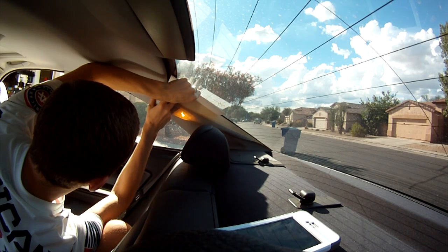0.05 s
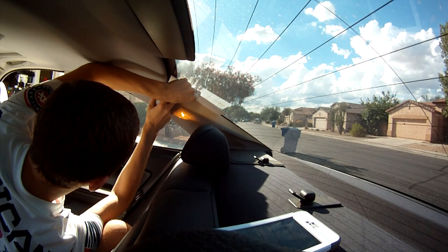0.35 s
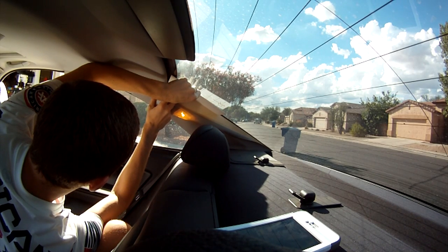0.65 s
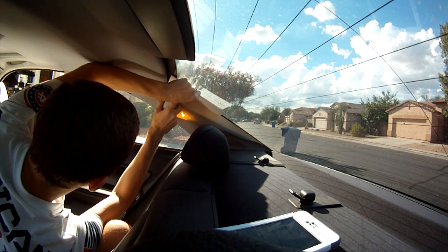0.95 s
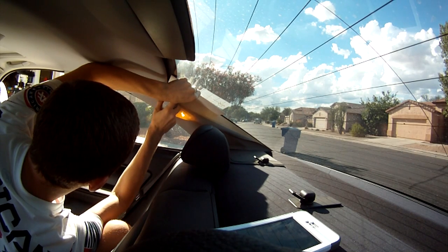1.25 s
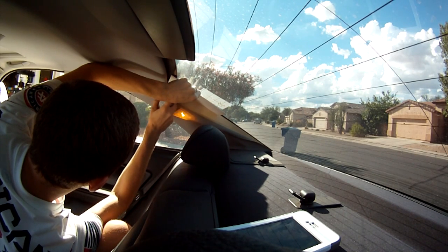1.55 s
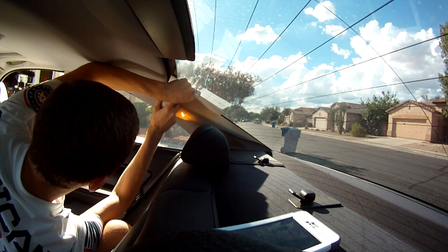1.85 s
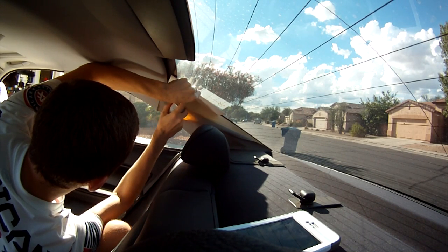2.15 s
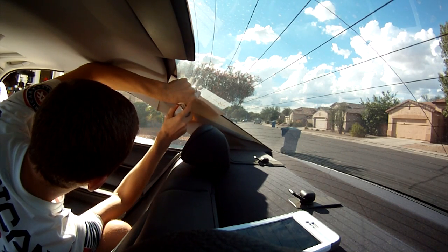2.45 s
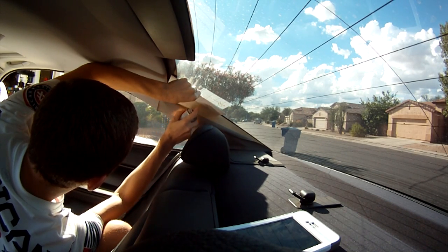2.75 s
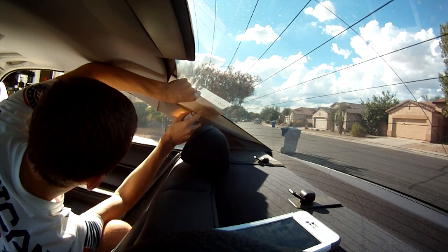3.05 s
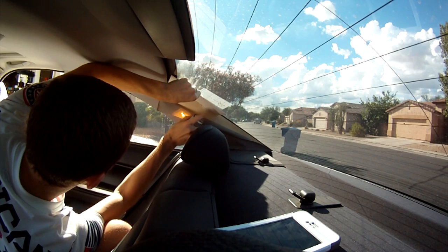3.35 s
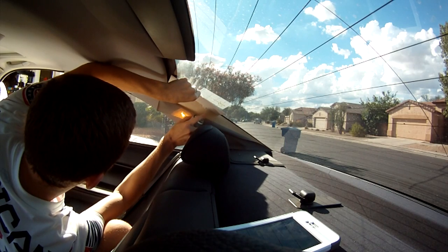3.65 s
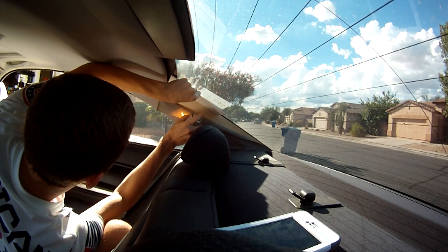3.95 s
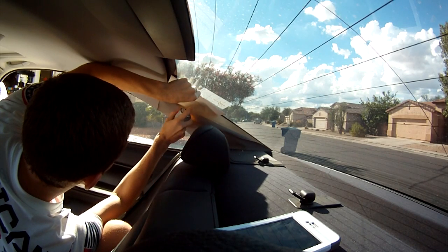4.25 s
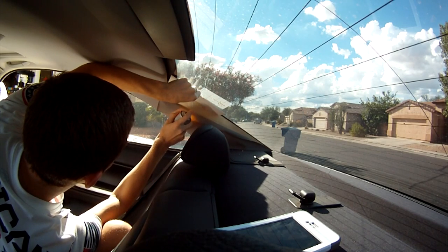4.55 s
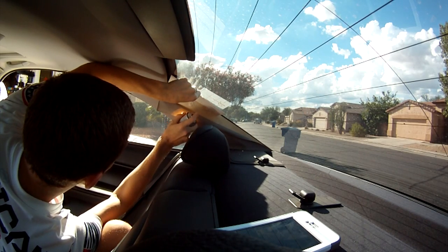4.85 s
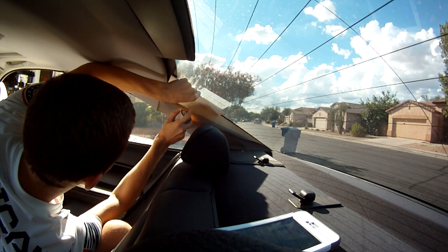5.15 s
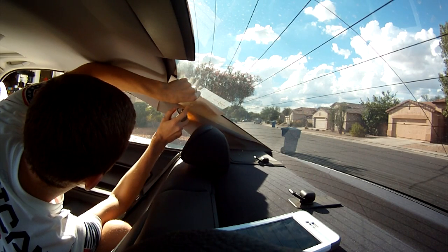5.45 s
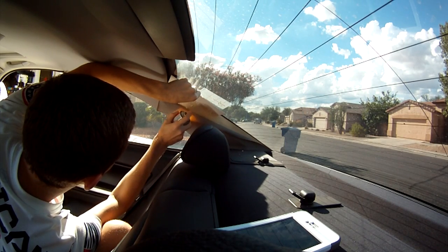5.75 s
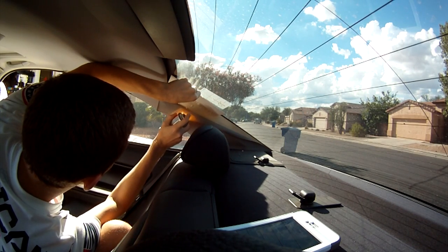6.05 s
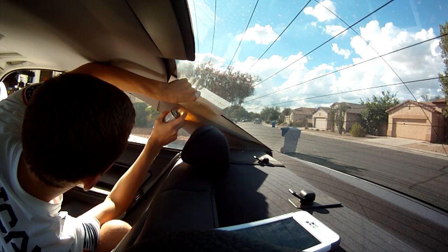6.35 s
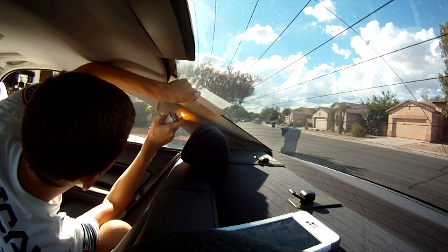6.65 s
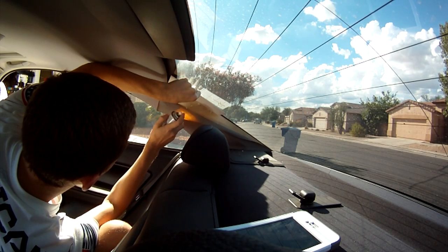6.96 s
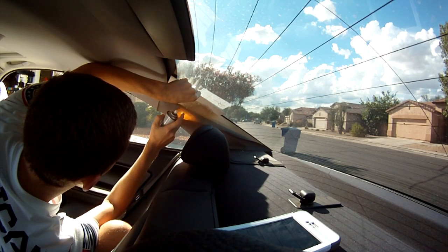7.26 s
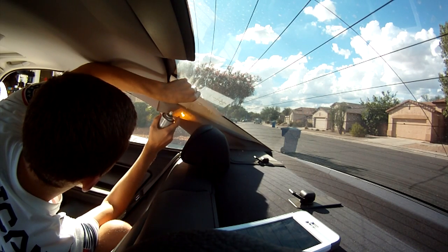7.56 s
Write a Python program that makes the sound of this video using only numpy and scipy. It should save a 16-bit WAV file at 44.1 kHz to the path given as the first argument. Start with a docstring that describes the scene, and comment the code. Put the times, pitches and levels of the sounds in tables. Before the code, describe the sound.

A low street rumble and a faint hiss run throughout inside a parked car. At about 0.9 seconds a can of spray adhesive gives a short, bright hiss, an arm's length from the microphone, then its nozzle dribbles and spits. Two slightly longer sprays follow at 2.0 and 2.5 seconds. Around 3 seconds the nozzle sputters with tiny wet squeaks, and the trim takes a dull knock just before a weaker spray at 3.2. Short bursts come at 3.4, 4.1, 4.6, 5.2 and 5.7 seconds, growing louder, the last two very brief. A hand taps lightly on the can near 3.9 and 6.6 seconds. The cabin adds tight reflections, and the rumble swells softly around 5.4 and 6.5 seconds. After the last burst, wet glue fizzes very faintly under the rumble until the end, near 7.6 seconds.

```python
"""A low street rumble and a faint hiss fill a parked car; then a can of spray adhesive hisses at the
door pillar, an arm's length from a small camera. Each full press gives a turbulent jet; between the
early ones the half-open valve dribbles, spits glue and squeaks. Wet glue fizzes, the trim takes a dull
knock and a hand shifts on the can. The cabin adds short reflections and booms in its low air modes;
the microphone rings near 5.7 kHz."""
import sys
import numpy as np
from scipy import signal
from scipy.fft import rfft, irfft
from scipy.io import wavfile
from scipy.ndimage import uniform_filter1d

SR = 44100
rng = np.random.default_rng(int(sys.argv[2]) if len(sys.argv) > 2 else 0)


def transcribe(signal):
    """Save signal, clipped to [-1, 1], as a 16-bit WAV file at the path in sys.argv[1]."""
    frames = np.atleast_2d(signal).T
    limited = np.clip(frames, -1, 1)
    pcm = np.round(limited * 32767).astype(np.int16)
    wavfile.write(sys.argv[1], SR, pcm)


N = 335292
T = np.arange(N) / SR


def undb(db):
    """Decibels to amplitude ratio."""
    return 10 ** (np.asarray(db) / 20)


def unit(x):
    """Normalisation to rms 1."""
    return x / np.sqrt(np.mean(x ** 2) + 1e-18)


def curve(rows):
    """Linear interpolation of (time_s, value) rows."""
    return np.interp(T, *np.transpose(rows))


def walk(per_s, size=N):
    """Random modulation: Gaussian values joined by straight lines, with a spread near 1."""
    steps = np.arange(size) / SR * per_s
    return 1.2 * np.interp(steps, np.arange(4096), rng.standard_normal(4096))


def add(out, start_s, x):
    """Superposition of x on out from a given time."""
    i = int(start_s * SR)
    out[i:i + len(x)] += x[:N - i]


def colour(x, points, size=4096):
    """Minimum-phase filtering by (frequency_hz, gain_db) points: causal, so attacks stay sharp."""
    hz, db = np.transpose(sorted(map(tuple, points)))
    bin_hz = np.arange(size // 2 + 1) * SR / size
    log_gain = np.log(undb(np.interp(np.log(bin_hz + 1), np.log(hz), db)))
    cepstrum = irfft(log_gain)
    cepstrum[1:size // 2] *= 2
    cepstrum[size // 2 + 1:] = 0
    response = irfft(np.exp(rfft(cepstrum)))
    return signal.oaconvolve(x, response)[:len(x)]


def noise(spectrum):
    """Spectral shaping of white noise, at rms 1."""
    return unit(colour(rng.standard_normal(N), spectrum))


def bursts(events, spectrum, attack_s, gain_db, pop=0, pop_s=0.0019):
    """Noise transients with exponential decay and an optional pop; overlapping ones add in power."""
    power, t = np.zeros(N), T[:SR // 5]
    for start, db, t60 in events:
        onset = 1 - np.exp(-t / attack_s)
        decay = undb(-60 * t / t60) + pop * np.exp(-t / pop_s)
        add(power, start, (onset * decay * undb(db + gain_db)) ** 2)
    return noise(spectrum) * np.sqrt(power)


# Spectrum of the street rumble: frequency_hz, gain_db
RUMBLE_SPECTRUM = [(15, -71), (25, -53), (37, -19), (75, -25), (102, -8.5), (144, -6.5), (178, -1),
                   (252, -10.5), (310, -5), (383, -15.5), (509, -9.5), (657, -31), (741, -12.5), (860, -39),
                   (900, -13.5), (1170, -42), (1980, -120)]
# Swells that drive the boom: time_s, level_db
RUMBLE_SWELLS = [(0, -66.5), (0.7, -65), (1.1, -66), (1.6, -63), (1.9, -65), (3.0, -66), (3.2, -64.5),
                 (4.1, -60), (4.45, -66), (5.0, -62), (5.4, -55.5), (5.9, -61), (6.45, -56), (7.05, -66.5),
                 (7.6, -64)]
# Low air modes of the cabin: frequency_hz, width_hz, relative_db
AIR_MODES = [(126.5, 30, -6.5), (181.7, 20.3, 2), (315, 33, 0.5)]

def rumble(steady_db=-66, boom_gain_db=-1):
    """Cavity resonance: power in excess of the steady street rumble booms in the cabin's air modes."""
    street = noise(RUMBLE_SPECTRUM) * undb(steady_db)
    excess_power = np.maximum(undb(curve(RUMBLE_SWELLS)) ** 2 - undb(steady_db) ** 2, 0)
    boom = np.zeros(N)
    for hz, width, db in AIR_MODES:
        b, a = signal.iirpeak(hz, hz / (2 * width), fs=SR)
        band = signal.lfilter(b, a, rng.standard_normal(N))
        boom += unit(signal.lfilter(b, a, band)) * undb(db)
    return street + unit(boom) * np.sqrt(excess_power) * undb(boom_gain_db)


# Spectrum of the background hiss: frequency_hz, gain_db
HISS_SPECTRUM = [(350, -32), (600, -3.5), (777, -6), (1110, -11), (1410, -9.5), (1620, -9), (1810, -8.5),
                 (2130, -13), (3710, -12.5), (5980, -8), (8990, -20), (9760, -19.5), (15500, -33.5)]
# Its slow drift: time_s, relative_db
HISS_DRIFT = [(0.8, -66.5), (3.7, -64.5), (6.2, -65), (7.6, -66)]

def hiss(gain_db=-1):
    """Ambient noise floor: faint, broadband and nearly stationary."""
    return noise(HISS_SPECTRUM) * undb(curve(HISS_DRIFT) + gain_db)


# Spectrum of the open jet: frequency_hz, gain_db
JET_SPECTRUM = [(40, -43), (200, -29), (420, -22.5), (630, -24.5), (980, -14.3), (1200, -14.5), (1900, -17),
                (2500, -20.5), (3400, -14.5), (4400, -9), (5200, 1.95), (6100, -1.35), (7000, -6),
                (9200, -15.5), (15000, -19.5)]
# Presses of the valve: open_s, close_s, level_db, rise_s, fall_s, trim_echo_ms, trim_echo_ratio,
# breadth_db, body_hz, body_db, edge_db. The last four set how broad each hiss is, the pitch and
# strength of its body, and its sharp edge.
VALVE_PRESSES = [(0.877, 1.079, -30, 0.021, 0.023, 0.79, -0.1, 3, 2230, 4, -4.5),
                 (1.993, 2.348, -27.5, 0.066, 0.027, 0.89, -0.13, 2, 1170, -0.3, -0.5),
                 (2.465, 2.784, -26.5, 0.012, 0.017, 0.408, -0.27, 0.8, 1300, 0, -2.5),
                 (3.174, 3.31, -34, 0.014, 0.27, 0.635, 0.22, 5.5, 1700, -5, -2.5),
                 (3.416, 3.591, -26.5, 0.05, 0.014, 0.85, 0.17, 1.8, 1110, 1, -1),
                 (4.092, 4.271, -23.5, 0.014, 0.012, 0.635, -0.24, 0.8, 1090, -4, 4),
                 (4.573, 4.738, -23.5, 0.033, 0.011, 0.385, -0.19, -5.5, 1740, 6.5, 1.2),
                 (5.206, 5.315, -23, 0.014, 0.011, 0.794, 0.1, -0.5, 1310, -3, 3),
                 (5.717, 5.821, -21.5, 0.0085, 0.011, 0.363, 0.032, -0.5, 870, -0.5, 8)]

def jet(flutter_db=-0.8, surge_db=0.51, initial_opening=0.18, seal_s=0.19):
    """Turbulent jet noise: it builds as the valve cracks open and dies as the stem springs back."""
    out, t = np.zeros(N), T[:SR]
    for start, stop, db, rise, fall, echo_ms, echo_ratio, *aim in VALVE_PRESSES:
        gas = rng.standard_normal(len(t))
        gas = gas + echo_ratio * np.roll(gas, round(echo_ms * SR / 1000))  # comb interference
        gas = resonate(colour(gas, JET_SPECTRUM))
        gas = colour(gas, jet_colour(db, *aim))
        # hand, pillar and windscreen scatter the short waves, differently at each position of the can
        gas = reflections(gas, wet_db=-5, t60_s=0.025, above_hz=2340)
        # glue and propellant leave the nozzle unevenly
        uneven_db = flutter_db * walk(211.4, len(t)) + surge_db * walk(32.3, len(t))
        opening = 1 - (1 - initial_opening) * np.exp(-(t / rise) ** 2)
        released_s = np.maximum(t - (stop - start), 0)
        # the seal shuts however slowly the finger lifts
        closing = np.exp(-released_s / fall - (released_s / seal_s) ** 4)
        add(out, start, unit(gas) * opening * closing * undb(db + uneven_db))
    return reflections(out, wet_db=-12, t60_s=0.042)


# Resonances of the cabin corner and camera housing: frequency_hz, width_hz, lift_db
NARROW_RESONANCES = [(940, 36, 6.5), (1380, 80, 0.5), (1924, 24, 4), (2360, 200, 3.5), (2830, 50, 5),
                     (3360, 32, 1.5), (4200, 20, 5.5), (4760, 85, 1.5), (5260, 140, 2.5), (5690, 120, 3),
                     (6197, 100, 6.5), (7630, 120, 3), (8140, 78, 0.5), (8740, 81, 5.5), (10610, 660, 4.5),
                     (13500, 500, 2.5)]

def resonate(x):
    """Resonance lifts a narrow band around each natural frequency."""
    for hz, width, db in NARROW_RESONANCES:
        band = signal.lfilter(*signal.iirpeak(hz, hz / width, fs=SR), x)
        x = x + (undb(db) - 1) * band
    return x


def jet_colour(level_db, breadth_db, body_hz, body_db, edge_db, mic_hz=5700, edge_hz=3230, usual_db=-28):
    """Directivity and spectral tilt: aim weights three bands; a harder press trades bass for treble."""
    hz = np.geomspace(100, 16000, 60)

    def bump(centre_hz, octaves):
        return np.exp(-(np.log2(hz / centre_hz) / octaves) ** 2)

    flanks_db = breadth_db * (1 - bump(mic_hz, 0.22))  # either side of the microphone's ring
    aim_db = flanks_db + body_db * bump(body_hz, 0.62) + edge_db * bump(edge_hz, 0.38)
    bass = 1 / (1 + (hz / 746) ** 4)
    treble = 1 / (1 + (10000 / hz) ** 6)
    tilt_db = (level_db - usual_db) * (0.91 * treble - 0.44 * bass)
    return zip(hz, aim_db + tilt_db)


def reflections(x, wet_db, t60_s, above_hz=None):
    """Early reflections off nearby glass and trim die quickly; small surfaces return only the treble."""
    t = T[:6000]
    tail = rng.standard_normal(len(t)) * (t > 0.0015) * undb(-60 * t / t60_s)
    if above_hz:
        tail = signal.lfilter(*signal.butter(1, above_hz, "high", fs=SR), tail)
    response = tail * undb(wet_db) / np.linalg.norm(tail)
    response[0] = 1  # direct sound
    return signal.oaconvolve(x, response / np.linalg.norm(response))[:len(x)]


# Spectrum of fizzing and bursting glue: frequency_hz, gain_db
GLUE_SPECTRUM = [(300, -52), (950, -21), (2200, -24.5), (3500, -19.5), (4600, -14.5), (5700, 1.5),
                 (6800, -7), (8500, -19.5), (10000, -25.5), (15000, -34)]

def fizz(level_db=-68, fade_db_per_s=1.5):
    """Effervescence: propellant boils out of wet glue from the first press on, fading after the last."""
    first_press, last_release = VALVE_PRESSES[0][0], VALVE_PRESSES[-1][1]
    db = level_db - fade_db_per_s * np.maximum(T - last_release, 0)
    return noise(GLUE_SPECTRUM) * (T > first_press) * undb(db)


# Big clots bursting from the nozzle: start_s, relative_db
BIG_CLOTS = [(0.878, -22), (1.167, -28.5), (1.199, -24), (1.251, -28.5), (1.258, -22), (1.285, -28),
             (1.296, -22.5), (1.335, -31), (1.347, -26), (1.431, -24.5), (1.46, -24.5), (1.544, -24.5),
             (1.929, -31), (2.426, -22), (2.469, -16.5), (2.851, -24), (2.957, -21), (3.04, -26),
             (3.131, -22), (3.179, -28), (5.891, -24)]

def spits(small_per_s=16, small_offset_db=7, scatter_db=2, t60_s=0.04):
    """Film rupture: each clot pops, then puffs. Small ones come at random, scaled by the dribble's flow."""
    clots = list(BIG_CLOTS)
    for stretch in DRIBBLE_FLOW:
        times, flow_db = np.transpose(stretch)
        jitter, strength = rng.random((60, 2)).T
        starts = times[0] + (np.arange(len(jitter)) + jitter) / small_per_s
        levels = np.interp(starts, times, flow_db) + small_offset_db + scatter_db * (2 * strength - 1)
        clots += [(start, db) for start, db in zip(starts, levels) if start < times[-1]]
    events = [(start, db, t60_s) for start, db in clots]
    return bursts(events, GLUE_SPECTRUM, attack_s=0.0006, gain_db=-11, pop=0.65)


# Flow through the half-open valve, one list per stretch: time_s, relative_db
DRIBBLE_FLOW = [
    [(1.11, -42.5), (1.18, -48.5), (1.32, -49.5), (1.35, -44.5), (1.42, -44), (1.48, -38), (1.6, -41.5),
     (1.81, -40.5), (1.85, -44.5), (2.02, -37.5)],
    [(2.38, -42.5), (2.46, -34.5)],
    [(2.82, -66), (2.89, -53), (2.95, -43.5), (3.07, -41), (3.11, -46), (3.17, -46.5)],
]
# Spectrum of that flow: frequency_hz, gain_db
DRIBBLE_SPECTRUM = [(240, -47), (400, -27.5), (796, -25.5), (942, -13), (1080, -18.5), (1380, -16),
                    (2360, -17), (2880, -16.5), (3110, -20.5), (5650, 2), (8670, -13), (9500, -19.5),
                    (14400, -24), (15500, -34)]

def dribble(bubble_db=3, sputter_db=1.5, treble_hz=8500, treble_db=5, gain_db=-1):
    """Two-phase flow: bubbles and clots modulate the half-open valve's hiss; more flow is brighter."""
    flow = np.zeros(N)
    for stretch in DRIBBLE_FLOW:
        is_open = (T > stretch[0][0] - 0.01) & (T < stretch[-1][0] + 0.01)
        gate = np.abs(uniform_filter1d(is_open.astype(float), size=400))
        flow += undb(curve(stretch)) * gate
    froth = rng.standard_normal(N) * undb(bubble_db * walk(per_s=500) + sputter_db * walk(per_s=90))
    froth = unit(colour(froth, DRIBBLE_SPECTRUM))
    body = signal.sosfiltfilt(signal.butter(2, treble_hz, fs=SR, output="sos"), froth)
    treble = (froth - body) * undb(treble_db) * flow / flow.max()
    return (body + treble) * flow * undb(gain_db)


def choke(gather_s=0.018, depth_db=-5.5):
    """Constriction: the dribble's gain sinks as a big clot gathers and recovers when it bursts."""
    db = np.zeros(N)
    for start, _ in BIG_CLOTS:
        db += depth_db * (T < start) * np.exp(-((T - start) / gather_s) ** 2)
    return undb(db)


# Wet squeaks in the nozzle: start_s, from_hz, to_hz, length_s, peak_db
NOZZLE_SQUEAKS = [(2.963, 1376, 1150, 0.029, -55), (3.007, 1660, 1410, 0.04, -54),
                  (3.033, 2950, 2770, 0.02, -52), (3.033, 1450, 1240, 0.033, -49.5),
                  (3.119, 1260, 1490, 0.019, -55)]

def squeaks(pitch_jitter=0.051):
    """Flow-induced oscillation: gas whistles through a film of glue at an unsteady, gliding pitch."""
    out = np.zeros(N)
    for start, from_hz, to_hz, length, db in NOZZLE_SQUEAKS:
        n = int(length * SR)
        hz = np.linspace(from_hz, to_hz, n) * (1 + pitch_jitter * walk(550, n))
        phase = 2 * np.pi * np.cumsum(hz) / SR
        add(out, start, np.sin(phase) * np.hanning(n) * undb(db))
    return out


# A dull knock on the trim: start_s, pitch_hz, level_db, rise_s, t60_s
TRIM_KNOCK = (3.142, 285, -41, .004, .065)

def knock():
    """Damped free vibration: one soft blow rings a low panel mode."""
    start, hz, db, rise, t60 = TRIM_KNOCK
    t = np.maximum(T - start, 0)
    onset = 1 - np.exp(-(t / rise) ** 2)
    return np.sin(2 * np.pi * hz * t) * onset * undb(db - 60 * t / t60)


# Light contacts of the hand: start_s, relative_db, t60_s
HAND_TAPS = [(3.8729, -40.5, 0.037), (3.8874, -51.5, 0.11), (4.008, -47.5, 0.032), (6.6378, -49, 0.11)]
# Their spectrum: frequency_hz, gain_db
TAP_SPECTRUM = [(800, -24), (1400, -11), (2300, -5), (3800, 1), (5600, 10), (7500, -3), (15000, -28)]

def taps():
    """Contact noise: the hand shifting on the can and trim makes brief broadband transients."""
    return bursts(HAND_TAPS, TAP_SPECTRUM, attack_s=0.00078, gain_db=-1)


def scene():
    """Superposition of all sources in the cabin, the same in both channels."""
    small_sounds = taps() + dribble() * choke() + spits() + squeaks()
    small_sounds = reflections(small_sounds, wet_db=-5, t60_s=0.059)
    mono = jet() + small_sounds + knock() + rumble() + hiss() + fizz()
    return np.array([mono, mono])


def record(dry, cutoff_hz=15450):
    """Band limiting: the camera's steep low-pass filter removes the highest treble."""
    return signal.sosfilt(signal.ellip(10, 0.2, 70, cutoff_hz, fs=SR, output="sos"), dry)


dry = scene()
out = record(dry)
transcribe(out)
```